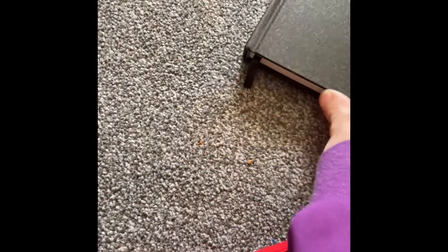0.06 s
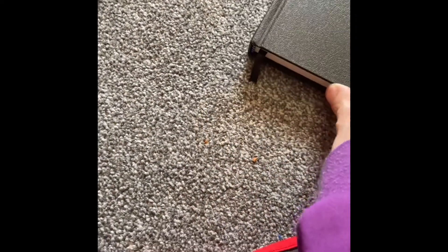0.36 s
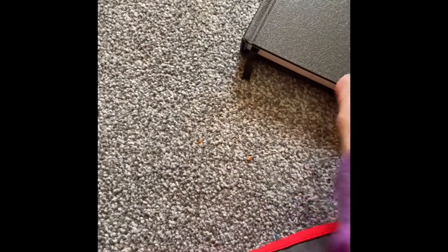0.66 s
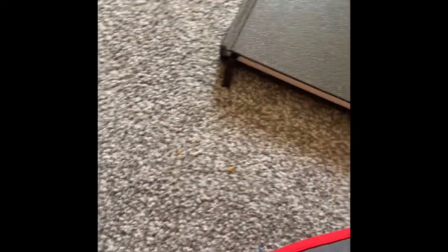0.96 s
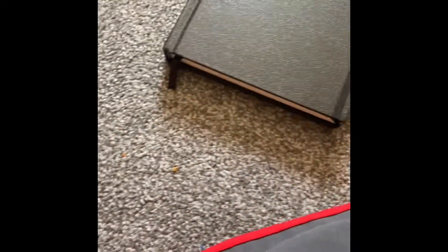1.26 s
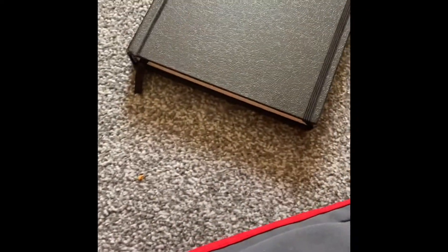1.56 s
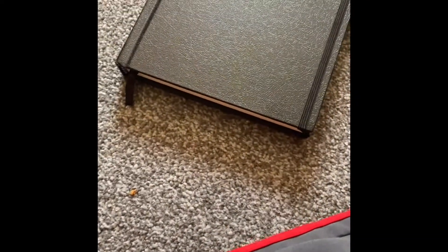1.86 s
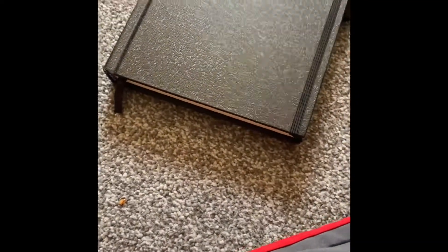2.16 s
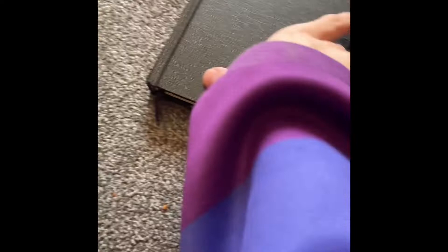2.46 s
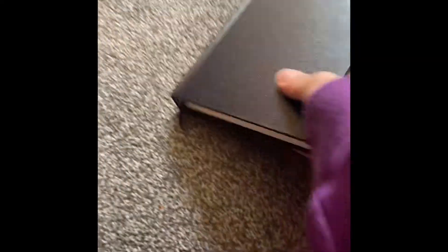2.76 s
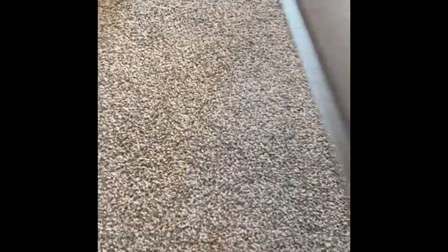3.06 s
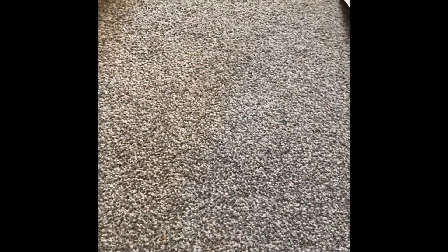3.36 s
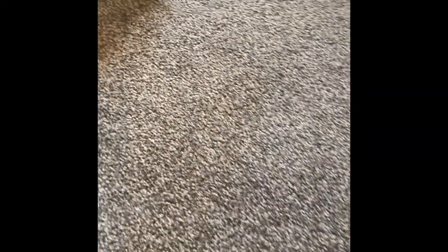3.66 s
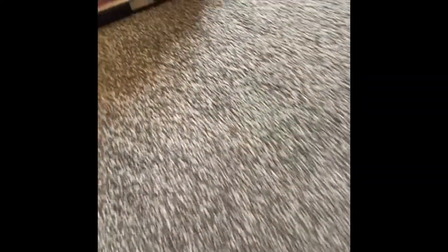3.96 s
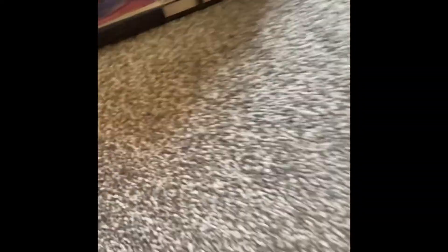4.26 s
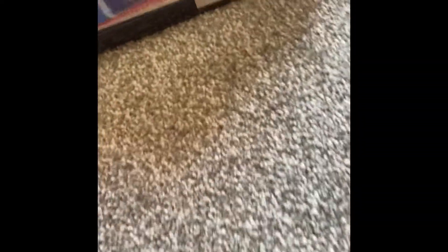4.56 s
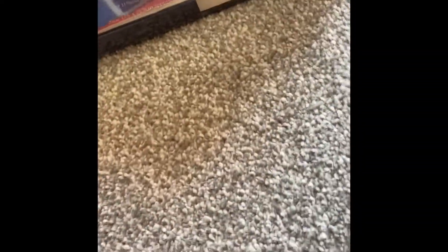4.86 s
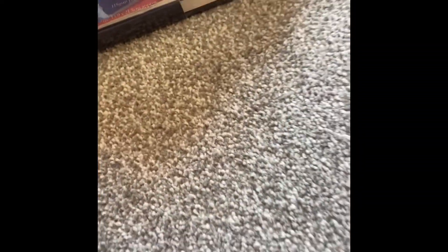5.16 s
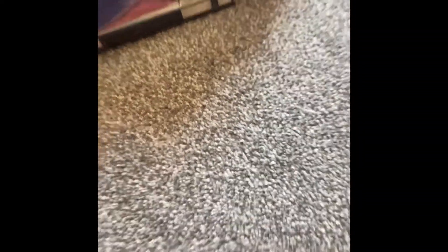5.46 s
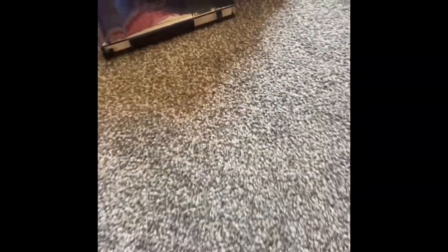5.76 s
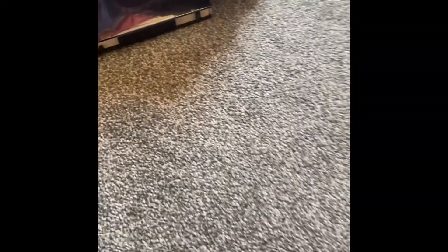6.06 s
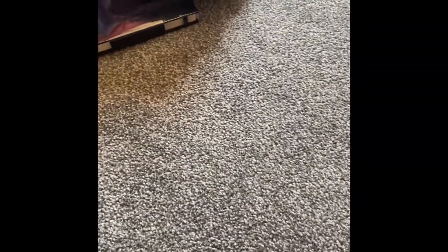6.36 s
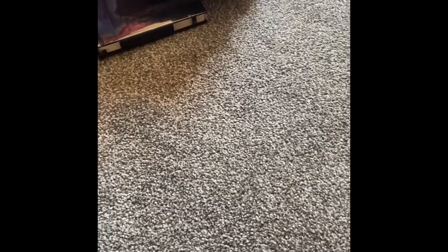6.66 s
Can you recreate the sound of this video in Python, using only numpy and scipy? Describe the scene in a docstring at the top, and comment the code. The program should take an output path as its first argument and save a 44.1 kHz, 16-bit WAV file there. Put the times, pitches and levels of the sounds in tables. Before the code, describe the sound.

In a small, quiet room, sharp clicks and dull knocks come from a hardback book handled near the microphone. Hand and sleeve rub across the cover, then the book lands on the carpet with a soft, low thump. A dry sliding scrape follows as another book moves over the carpet, ending in a scatter of crisp taps and clicks slightly further away.

```python
"""Hardback sketchbooks click and knock as they are handled on a carpet, close to a mono microphone.
Hard impacts on a board edge excite bending waves; soft blows on a cover excite heavily damped modes.
Stick-slip friction of hands, sleeves and covers scrapes, hisses and drums over the pile.
One book lands with a thump that drives the floor's low modes; later a second slides and is tapped
a little further off. The small, quiet room adds a short reverberation, faint air and a low rumble."""
import sys
import numpy as np
from scipy import signal
from scipy.fft import rfft, irfft, next_fast_len
from scipy.io import wavfile
from scipy.ndimage import uniform_filter1d

SR = 44100
rng = np.random.default_rng(int(sys.argv[2]) if len(sys.argv) > 2 else 0)


def persist_wave(psi):
    """Save psi, clipped to +-1, as 16-bit WAV."""
    counts = np.round(np.clip(psi, -1, 1) * 32767).astype(np.int16)
    wavfile.write(sys.argv[1], SR, np.atleast_2d(counts).T)


N = 296173
ON_PILE_S = 3.9   # from here on the books slide on the carpet
CUTOFF_HZ = 16500


def from_db(db):
    """Amplitude ratio of a level in decibels."""
    return 10 ** (np.asarray(db) / 20)


def rms_one(x):
    """Normalisation to rms 1."""
    return x / np.sqrt(np.mean(x ** 2) + 1e-20)


def seconds(length):
    """Uniform sampling of a time axis."""
    return np.arange(int(length * SR)) / SR


def in_time(rows):
    """Linear interpolation of (seconds, value) rows at every sample."""
    return np.interp(np.arange(N) / SR, *np.transpose(rows))


def add(track, s, sound):
    """Superposition of a sound on the track at time s."""
    start = max(0, round(s * SR))
    track[start:start + len(sound)] += sound[:N - start]


def ring(t, hz, t60):
    """Free vibration of a damped mode, falling 60 dB in t60 seconds."""
    return np.sin(2 * np.pi * hz * t) * from_db(-60 * t / t60)


def drift(per_s):
    """Slow random modulation through per_s values a second; rms 1."""
    knots = np.arange(N) * per_s / SR
    return rms_one(np.interp(knots, np.arange(N // 20), rng.standard_normal(N // 20)))


def coloured(x, spectrum):
    """Spectral shaping by (Hz, dB) rows, falling 40 dB an octave beyond their ends; rms 1."""
    size = next_fast_len(len(x))
    octave = np.log2(np.maximum(np.fft.rfftfreq(size, 1 / SR), 1))
    hz, db = np.transpose(spectrum)
    outside = np.abs(octave - np.clip(octave, np.log2(hz[0]), np.log2(hz[-1])))
    gain = from_db(np.interp(octave, np.log2(hz), db) - 40 * outside)
    return rms_one(irfft(rfft(x, size) * gain, size)[:len(x)])


def minimum_phase(gain_db):
    """Minimum phase: folding the cepstrum gives the shortest causal pulse with this spectrum."""
    cepstrum = irfft(np.log(from_db(gain_db)))
    half = len(cepstrum) // 2
    cepstrum[1:half] *= 2
    cepstrum[half + 1:] = 0
    return irfft(np.exp(rfft(cepstrum)))


# Spectrum of the still air. Each row: frequency in Hz, relative level in dB.
AIR_SPECTRUM = [(150, -23), (300, -3), (420, -4), (600, -6), (1400, -11.5), (3000, -17), (5500, -18.5),
                (10000, -22), (16000, -31)]
def air(level_db=-68.3):
    """Ambient noise: a faint, stationary random signal."""
    return from_db(level_db) * coloured(rng.standard_normal(N), AIR_SPECTRUM)


# Spectrum of the rumble. Each row: frequency in Hz, relative level in dB.
RUMBLE_SPECTRUM = [(21, -53), (35, -14), (65, -2), (76, 1), (102, -4.5), (118, -4.5), (161, -2.5),
                   (216, -2), (260, 1), (340, -46), (570, -120)]
def rumble(drum_gain, room_db=-72, held_db=-64.5, pile_db=-63, reference_db=-50):
    """Incoherent sources add in power: the room's rumble and weight shifting with each stroke."""
    weight_db = np.where(np.arange(N) / SR < ON_PILE_S, held_db, pile_db)
    drag = from_db(weight_db) * (drum_gain / from_db(reference_db)) ** 0.45
    return np.hypot(from_db(room_db), drag) * coloured(rng.standard_normal(N), RUMBLE_SPECTRUM)


# Spectrum of the reflections. Each row: frequency in Hz, relative level in dB.
ROOM_SPECTRUM = [(120, -5), (230, 1), (600, -4), (1400, 0), (2200, -1), (3000, 3), (4300, -1), (6200, -1),
                 (8500, -3), (16000, -7)]
# Reverberant share of the blows, greater further off. Each row: time in seconds, level in dB.
REVERBERANT_SHARE = [(0, -18), (.5, -19.5), (2.9, -13), (3.5, -14), (5.55, -22), (6.02, -12.5),
                     (6.13, -9.5), (6.26, -13), (6.7, -8)]
def room(blows, rubs, rubs_db=-11, t60=.24, wall_s=0.012):
    """Reverberation: weak scatter from things nearby, the nearest wall's reflection, then a fast decay."""
    t = seconds(2 * t60)
    tail = coloured(rng.standard_normal(len(t)), ROOM_SPECTRUM) * from_db(-60 * t / t60)
    wall = 1 + 0.74 * np.exp(-np.abs(t - wall_s) / 0.0039)
    tail *= np.where(t < wall_s, 0.64, wall) * (t > .002)
    sent = blows * from_db(in_time(REVERBERANT_SHARE)) + rubs * from_db(rubs_db)
    return signal.fftconvolve(sent, tail / np.sqrt(np.sum(tail ** 2)))[:N]


def friction(per_s, spread_db, flutter_db):
    """Stick-slip: fibres catch and let go in impulses of uneven size, bunched by the uneven pile."""
    slips = (rng.random(N) < per_s / SR) * rng.choice([-1, 1], N)
    sizes = from_db(spread_db * np.minimum(rng.exponential(1, N), 4))
    return slips * sizes * from_db(flutter_db * drift(140))


def scratchy(x, bands=22, depth_db=3.2, per_s=45):
    """Amplitude modulation by band: tufts of different stiffness scratch in turn, each at its own pitch."""
    size = next_fast_len(N)
    hz, spectrum = np.fft.rfftfreq(size, 1 / SR), rfft(x, size)
    centres = np.geomspace(2000, CUTOFF_HZ, bands)
    out = np.zeros(N)
    for band in np.eye(bands):
        swell = from_db(depth_db * np.clip(drift(per_s), -2, 2))
        out += irfft(spectrum * np.interp(hz, centres, band), size)[:N] * swell
    return rms_one(out)


# Spectrum of flicking creases. Each row: frequency in Hz, relative level in dB.
CREASE_SPECTRUM = [(2500, 2), (4000, 11.5), (6000, -3), (8000, -16), (11500, -14), (15500, -27)]
def crackle(hiss_gain, full_db=-66, stir_db=-88, reference_db=-58):
    """Buckling: creases of sleeve and paper flick over in clusters; the sleeve is never quite still."""
    flicks = friction(per_s=300, spread_db=2.4, flutter_db=3)
    motion = np.hypot(hiss_gain, from_db(stir_db)) / from_db(reference_db)
    return from_db(full_db) * np.minimum(motion, 1) ** .7 * coloured(flicks, CREASE_SPECTRUM)


# Short bands of noise: quick scuffs of paper and cloth, and the woody ring of one clack (at 2.875 s).
# Each row: start in seconds, length in seconds, level in dB, centre in Hz, distance to the band's
# -4 dB points in octaves.
NOISE_BURSTS = [(0.008, 0.015, -55, 8000, 0.82), (0.135, 0.015, -58, 7900, 0.71),
                (0.475, 0.0026, -43, 8300, 0.69), (0.7, 0.077, -59, 6000, 0.43),
                (0.845, 0.028, -52, 6500, 0.4), (0.917, 0.018, -50, 7300, 0.66),
                (2.040, 0.011, -50, 9500, 2.6), (2.76, 0.0085, -45, 2900, 0.33),
                (2.769, 0.012, -52, 1650, 0.18), (2.875, 0.0017, -38.5, 1920, 0.16),
                (3.29, 0.06, -54, 13600, 0.1), (3.217, 0.029, -59.5, 5170, 0.93),
                (3.243, 0.14, -54.5, 10700, 0.25), (4.155, 0.29, -57, 11100, 0.36),
                (5.344, 0.031, -52, 5230, 0.2), (5.356, 0.008, -49, 2900, 0.54),
                (5.43, 0.077, -61, 5900, 0.079), (5.555, 0.026, -50, 3200, 0.41),
                (5.638, 0.0062, -42.5, 1400, 0.081), (6.142, 0.025, -55, 3100, 0.24),
                (6.268, 0.017, -54, 2680, 0.33), (6.413, 0.022, -60.5, 3850, 0.2),
                (6.643, 0.092, -52.5, 3180, 0.29)]
def scuffs_and_clack(attack_s=0.00015, release_s=0.0076):
    """Band-limited noise starts at once and trails off: heard as quick scuffs and one woody clack."""
    out = np.zeros(N)
    for s, length, db, hz, width in NOISE_BURSTS:
        t = seconds(length + 0.03)
        band = [(hz * 2 ** (k * width), -4 * k * k) for k in range(-3, 4)]
        attack = 1 - np.exp(-t / attack_s)
        release = np.exp(-np.maximum(t - length, 0) / min(release_s, length))
        add(out, s, from_db(db) * attack * release * coloured(rng.standard_normal(len(t)), band))
    return out


# Spectra of near scraping, far scraping and snags. Each row: frequency in Hz, relative level in dB.
NEAR_SPECTRUM = [(380, -62), (650, -10.5), (806, -6.5), (940, -8), (1100, -5), (1770, -8.5), (2200, -11),
                 (2750, -11), (3210, -11), (7500, -28.5), (9750, -55), (16500, -120)]
FAR_SPECTRUM = [(410, -49), (700, 3.5), (862, -8), (1000, -5), (1470, 0), (1660, 4.5), (2300, 3),
                (3300, -3), (4700, 1.5), (5850, -5.5), (7500, -26), (9750, -28), (16500, -120)]
SNAG_SPECTRUM = [(700, 11), (1800, 4), (4000, -5), (8000, -15), (15000, -19)]
# The handling moves away. Each row: time in seconds, far scrape's share of the power from 0 to 1.
FAR_POWER_SHARE = [(4.6, 0.26), (5.2, 0.6)]
def scraping(slips, held, snag_db=-9):
    """Sliding friction excites the boards; single sleeve fibres snag on the book while it is held."""
    far_share = in_time(FAR_POWER_SHARE)
    near = coloured(slips, NEAR_SPECTRUM)
    far = scratchy(coloured(friction(per_s=7000, spread_db=0.5, flutter_db=2), FAR_SPECTRUM))
    snags = coloured(friction(per_s=90, spread_db=8.5, flutter_db=-4), SNAG_SPECTRUM)
    return np.sqrt(1 - far_share) * near + np.sqrt(far_share) * far + held * from_db(snag_db) * snags


# Spectra of a cover in the hand and on the pile. Each row: frequency in Hz, relative level in dB.
HELD_SPECTRUM = [(170, -17), (270, -7), (340, -2), (415, 3), (500, -3), (640, -8), (900, -15)]
PILE_SPECTRUM = [(115, -8), (165, 5), (205, -2), (260, -1), (330, -4), (450, -4), (600, -7), (850, -9)]
def drumming(held, wander_octaves=.13):
    """Forced vibration: a held cover booms at a pitch the grip shifts; the pile gives a low, rough burr."""
    stutter = friction(per_s=1500, spread_db=1.2, flutter_db=2.2)
    read_position = np.cumsum(2 ** (wander_octaves * drift(14)))
    boom = np.interp(read_position % N, np.arange(N), coloured(stutter, HELD_SPECTRUM))
    return np.where(held, boom, coloured(stutter, PILE_SPECTRUM))


def cover_reflection(x, share=0.25, lag_s=0.001087, wander_octaves=0.614):
    """Comb filtering: sound interferes with its bounce off the cover, whose path varies with the hand."""
    n = np.arange(N)
    lag = lag_s * SR * 2 ** (wander_octaves * drift(9))
    return (x + share * np.interp(n - lag, n, x)) / np.hypot(1, share)


# Strokes of a hand, sleeve or cover. Each row: start in seconds, length in seconds, share of the
# length spent speeding up, then peak levels of scrape, hiss and drumming in dB.
RUBBING_STROKES = [(0, 0.07, 0.055, -52.5, -59, -59.5), (0.065, 0.062, 0.45, -58, -68, -63),
                   (0.126, 0.09, 0.15, -57.5, -69, -68), (0.237, 0.058, 0.29, -54, -57.5, -52),
                   (0.285, 0.11, 0.87, -53, -59, -48.5), (0.462, 0.068, 0.3, -57, -63, -52),
                   (0.572, 0.24, 0.72, -60, -62.5, -67), (0.834, 0.077, 0.34, -59.5, -61, -70),
                   (0.907, 0.082, 0.15, -63, -64.5, -66.5), (1.09, .28, .3, -88, -78, -85),
                   (1.7, .13, .62, -70, -75, -59), (2.039, 0.075, 0.76, -82, -59, -73),
                   (2.117, 0.11, 0.51, -59.5, -56, -71), (2.206, 0.23, 0.33, -60.5, -65, -72),
                   (2.422, 0.06, 0.67, -56, -67, -51), (2.538, 0.1, 0.25, -53, -58, -51),
                   (2.636, 0.11, 0.48, -52.5, -57, -50.5), (2.736, 0.06, 0.54, -48.5, -57, -47.5),
                   (2.766, 0.09, 0.22, -58, -63, -47), (2.83, .15, 0.87, -60, -62, -63),
                   (2.95, 0.15, 1, -70, -93, -64), (3.23, 0.043, 0.54, -57, -52, -69),
                   (3.265, 0.13, 0.67, -56.5, -52, -73), (3.572, 0.097, 0.36, -61, -63, -56.5),
                   (3.847, 0.75, 0.89, -65, -69, -63), (4.099, 0.22, 0.31, -53, -54.5, -61),
                   (4.228, 0.28, 0.68, -49.5, -55, -53.5), (4.477, 0.21, 0.14, -59.5, -64, -59),
                   (4.673, 0.28, 0.59, -60, -65, -60), (4.982, 0.82, 0.13, -63, -70, -67.5),
                   (5.332, 0.057, 0.48, -52.5, -58.5, -57), (5.405, 0.08, 0.77, -55.5, -60.5, -61),
                   (5.481, 0.073, 0.41, -48.5, -51.5, -51), (5.535, 0.07, 0.35, -51, -48.5, -61),
                   (5.602, 0.091, 0.24, -51.5, -59, -50), (5.666, 0.12, 0.32, -62, -64, -60),
                   (6.012, 0.05, 0.35, -64, -66, -50), (6.058, 0.28, 0.19, -65, -66.5, -65.5),
                   (5.797, 0.24, 0.32, -72.5, -76.5, -90), (6.317, 0.21, 0.38, -62.5, -69.5, -68.5),
                   (6.546, 0.11, 0.86, -61.5, -71, -73), (6.625, 0.089, 0.62, -56, -58, -65.5)]
def stroke_gains(exponents=(0.56, 0.56, 0.76)):
    """Power laws: scrape, hiss and drumming follow each stroke's speed, which rises and falls in an arc."""
    power = np.zeros((3, N))
    for s, length, rise, *levels_db in RUBBING_STROKES:
        arc = np.interp(seconds(length) / length, [0, np.clip(rise, .05, .95), 1], [0, .5, 1])
        speed = np.abs(np.sin(np.pi * arc))
        for layer, db, exponent in zip(power, levels_db, exponents):
            add(layer, s, (from_db(db) * speed ** exponent) ** 2)
    return np.sqrt(power)


# Spectrum of the fibres' hiss. Each row: frequency in Hz, relative level in dB.
FIBRE_SPECTRUM = [(6000, 5), (7500, 1.5), (9800, 2.5), (12000, 0), (15500, -4.5), (16400, -39)]
def rubbing(scrape_gain, hiss_gain, drum_gain):
    """Friction noise: slips scrape along the boards, hiss in the fibres and set the cover drumming."""
    held = np.arange(N) / SR < ON_PILE_S
    slips = friction(per_s=26000, spread_db=2.5, flutter_db=1.14)
    scrape = scrape_gain * scraping(slips, held)
    hiss = hiss_gain * scratchy(coloured(slips, FIBRE_SPECTRUM))
    drum = drum_gain * drumming(held)
    return cover_reflection(scrape + hiss) + drum


# Modes of the floor. Each row: frequency in Hz, relative level in dB, 60 dB decay time in seconds.
FLOOR_RESONANCES = [(47, -12.5, 0.4), (71, -1, 0.13), (86.5, -11, 0.2), (169, -2.5, 0.1)]
# Weight landing on the carpet. Each row: start in seconds, gain in dB.
LANDINGS = [(3.48, -39), (3.535, -51), (3.691, -45), (3.736, -53), (5.656, -52)]
def thumps(swell_s=0.0069):
    """Modal response: the floor rings low under the weight of a book."""
    out, t = np.zeros(N), seconds(.6)
    floor = sum(from_db(db) * ring(t, hz, t60) for hz, db, t60 in FLOOR_RESONANCES)
    floor *= 1 - np.exp(-t / swell_s)
    for s, db in LANDINGS:
        add(out, s, from_db(db) * floor)
    return out


# Modes of the second book's stiff cover. Each row: frequency in Hz, relative level in dB,
# 60 dB decay time in seconds.
COVER_MODES = [(680, -9, .1), (980, 0, .1), (1152, -1, .1), (1360, -5, .07), (2078, -1, .08),
               (2350, -6, .08), (2920, -3, .08), (3040, -3, .08), (3410, -6, .07), (4060, -9, .07),
               (6160, -9, .05)]
# Taps on that cover. Each row: start in seconds, gain in dB, most strongly driven frequency in Hz.
COVER_TAPS = [(5.545, -50, 2900), (5.641, -55, 1500), (6.024, -42, 1250), (6.131, -47.5, 3500),
              (6.256, -49, 3400), (6.396, -56, 1900)]
def cover_rings(swell_s=0.0034, spread_octaves=0.7):
    """Selective excitation: a flat tap rings the cover's low modes, a sharp tap its high ones."""
    out, t = np.zeros(N), seconds(.3)
    swell = 1 - np.exp(-t / swell_s)
    for s, db, centre_hz in COVER_TAPS:
        for hz, mode_db, t60 in COVER_MODES:
            drive = np.exp(-.5 * (np.log2(hz / centre_hz) / spread_octaves) ** 2)
            detune = 1 + .003 * rng.standard_normal()
            add(out, s, from_db(db + mode_db) * drive * ring(t, hz * detune, t60) * swell)
    return out


# Soft blows on a cover. Each row: start in seconds, peak level in dB, main mode's frequency in Hz,
# its 60 dB decay time in seconds.
SOFT_BLOWS = [(0.082, -28, 404, 0.014), (0.2475, -32, 498, 0.0073), (0.285, -37, 374, 0.0048),
              (0.321, -37.5, 416, 0.049), (0.367, -38.5, 374, 0.099), (0.4426, -33, 413, 0.018),
              (0.4855, -25.5, 293, 0.013), (0.782, -50, 183, 0.036), (1.457, -47.5, 260, 0.024),
              (1.775, -48, 352, 0.041), (2.19, -54, 140, 0.077), (2.308, -39.5, 347, 0.014),
              (2.378, -46.5, 307, 0.015), (2.445, -38.5, 446, 0.01), (2.473, -41, 483, 0.013),
              (2.557, -35.5, 603, 0.035), (2.571, -42, 290, 0.033), (2.592, -42.5, 476, 0.04),
              (2.65, -37.5, 396, 0.025), (2.681, -37.5, 349, 0.039), (2.703, -42, 410, 0.036),
              (2.787, -31, 400, 0.02), (2.807, -36, 403, 0.035), (2.831, -42, 450, 0.033),
              (2.876, -37, 530, 0.013), (3.241, -50, 130, 0.028), (3.471, -37, 300, 0.01),
              (3.48, -30, 178, 0.032), (3.559, -45.5, 400, 0.035), (3.672, -39, 242, 0.025),
              (3.682, -39.5, 213, 0.017), (4.265, -47, 160, 0.062), (4.497, -46, 156, 0.12),
              (4.573, -49, 161, 0.07), (5.21, -48.5, 188, 0.043), (5.484, -42.5, 396, 0.016),
              (5.534, -44, 630, 0.0086), (5.586, -43.5, 260, 0.046), (5.644, -38.5, 196, 0.032),
              (6.023, -39, 475, 0.018), (6.13, -49, 403, 0.0053), (6.3953, -41, 425, 0.016),
              (6.539, -45.5, 428, 0.011), (6.618, -48, 253, 0.032)]
def knocks(contact_s=0.0011, radiate_hz=165):
    """Heavy damping: a soft blow excites three modes of the cover, and the pages absorb them at once."""
    out, t = np.zeros(N), seconds(.1)
    small_board = signal.butter(2, radiate_hz, "high", fs=SR, output="sos")   # too small to radiate bass
    swell = 1 - np.exp(-(t / contact_s) ** 2)
    for s, db, hz, t60 in SOFT_BLOWS:
        side_modes = ring(t, hz * 0.52, t60 * 2.7) + ring(t, hz * 1.56, t60 * 1.04)
        knock = signal.sosfilt(small_board, (ring(t, hz, t60) + 0.16 * side_modes) * swell)
        add(out, s, from_db(db) * knock / np.abs(knock).max())
    return out


def edge_contact(t, crunch_db, crunch_t60=0.039, chatter_s=.001, smooth_hz=700):
    """Contact force: a snap, chatter and a short crunch, whitened so that only fine ripple remains."""
    crunch = rng.standard_normal(len(t)) * from_db(-60 * t / crunch_t60)
    force = 3 * from_db(crunch_db) * crunch / np.linalg.norm(crunch)
    force += .17 * rng.standard_normal(len(t)) * np.exp(-t / chatter_s)
    force[0] = 1   # the snap
    broad_power = uniform_filter1d(np.abs(rfft(force)) ** 2, size=round(smooth_hz * len(t) / SR))
    whitening = minimum_phase(-10 * np.log10(broad_power + 1e-9))
    return signal.fftconvolve(force, whitening)[:len(t)]


# Resonances and hollows of each book's edge. Each row: centre in Hz, width in Hz, lift in dB.
FIRST_EDGE = [(970, 34, 8), (1360, 210, 3), (1780, 100, 0), (2410, 84, 5), (2790, 99, -3.5), (3470, 210, 0),
              (6300, 3900, 4), (9800, 1700, 4)]
SECOND_EDGE = [(1400, 300, 4), (1940, 160, -4), (2320, 260, 4), (2530, 120, -4), (3100, 600, 4.5),
               (3850, 300, 2.5), (6000, 1200, 7), (9900, 1900, 3)]
# Hard contacts of the edges. Each row: start in seconds, rms level of the first 2 ms in dB, tilt in dB
# per octave, fall either side of 3 kHz in dB per octave squared (none if negative), crunch gain in dB.
EDGE_IMPACTS = [(0.0805, -44, -8.5, 0, 9), (0.2214, -39.5, -3.5, -3, -16), (0.2424, -31, -2.5, 0.2, -18),
                (0.248, -28.5, -6.5, 2, -9.5), (0.261, -36, -11, 4.5, -14), (0.2842, -45, -8, -1.5, -6),
                (0.318, -48, 7, -0.5, -8), (0.3725, -42.5, -1, 4.5, -13), (0.4413, -33, -6.5, 1, -14),
                (0.4816, -36, -9, 2.5, -3), (0.4846, -25, 1.2, 1, -22), (0.9383, -44.5, -2.5, 0.5, -15),
                (1.0895, -54.5, -7, 1, -8), (2.484, -48, -18.5, 4.5, -1.5), (2.531, -47, -8.5, -3, -9),
                (2.649, -49, -9, 0, -10), (2.825, -52, -2, 6, -16), (2.875, -38.5, -7, 2.5, -12.5),
                (3.4664, -40.5, 0.5, 2.5, 2), (3.469, -42.5, -7.5, -3, -1), (3.4768, -44.5, -4.5, 0, -9),
                (3.535, -57, -5, 3, -12), (3.559, -51.5, -5, 0.5, -13), (3.6078, -48.5, -3, 8, 9),
                (3.6843, -51.5, -5, 2.5, -12), (3.713, -59, -5, 0, -8), (4.109, -51, -3.5, -2, -22),
                (4.654, -51, -6, 2.5, -10), (5.319, -48.5, -6.5, 3, -10), (5.3435, -50, -10, 4, 5),
                (5.355, -43.5, -3, 1.5, 5), (5.5321, -35.5, -4, 4.5, -11), (5.5375, -37.5, -18.5, 3.5, -7),
                (5.5441, -26.5, -6.5, 4, -12), (5.589, -41.5, -7, 2, -18), (5.631, -43, -12, 2.5, 9),
                (5.6395, -36.5, -24, 7, 1.5), (5.682, -45, -5, 7.5, 3), (5.863, -55.5, -3, 1.5, -4),
                (5.976, -54, -13, 5.5, -9), (6.0165, -38.5, -6, 1, 9), (6.0212, -42, -16, 1.5, -2),
                (6.0346, -39.5, -15.5, 4.5, -2), (6.127, -45, -2.5, -1, 2), (6.1297, -29.5, -3.5, 2.5, -17),
                (6.213, -47, -11.5, 1, -8), (6.2544, -29.5, 0, 5.5, -20), (6.3951, -42.5, -12.5, 3, -6),
                (6.537, -47, -8, -9, -9.5), (6.614, -46.5, -5.5, 1.5, -15)]
def clicks(radiate_hz=420, crossing_s=.0004, size=2048):
    """Dispersion: an edge impact sends bending waves across the resonant board, the low ones slowest."""
    out, t = np.zeros(N), np.arange(size) / SR
    hz = np.maximum(np.fft.rfftfreq(size, 1 / SR), 20)
    octaves = np.clip(np.log2(hz / 3000), -2.2, 2.3)
    bass_db = -10 * np.log10(1 + (radiate_hz / hz) ** 4)   # a small board radiates little bass
    bending = np.exp(-4j * np.pi * crossing_s * np.sqrt(3000 * hz))   # delay of crossing_s at 3 kHz
    for s, db, tilt_db, fall_db, crunch_db in EDGE_IMPACTS:
        modes = FIRST_EDGE if s < ON_PILE_S else SECOND_EDGE
        modes_db = sum(lift / (1 + (2 * (hz - centre) / width) ** 2) for centre, width, lift in modes)
        # hardness and place of the contact decide which resonances speak
        contact_db = tilt_db * octaves - max(fall_db, 0) * octaves ** 2
        board = irfft(rfft(minimum_phase(bass_db + modes_db + contact_db)) * bending)
        click = signal.fftconvolve(edge_contact(t, crunch_db), board)[:size]
        onset_rms = np.sqrt(np.mean(click[:SR // 500] ** 2))
        add(out, s, from_db(db) * click / onset_rms)
    return out


def scene():
    """Superposition of blows, rubbing, their reflections and the background, alike in both channels."""
    scrape_gain, hiss_gain, drum_gain = stroke_gains()
    blows = clicks() + knocks() + cover_rings()
    rubs = rubbing(scrape_gain, hiss_gain, drum_gain) + crackle(hiss_gain) + scuffs_and_clack()
    mono = air() + room(blows, rubs) + rumble(drum_gain) + rubs + thumps() + blows
    return np.array([mono, mono])


def record(dry):
    """Band limiting: the microphone drops the deepest bass, and a steep low-pass cuts the top."""
    thin = signal.sosfilt(signal.butter(6, 40, "high", fs=SR, output="sos"), dry)
    return signal.sosfilt(signal.ellip(10, .2, 70, CUTOFF_HZ, fs=SR, output="sos"), thin)


dry = scene()
out = record(dry)
persist_wave(out)
```